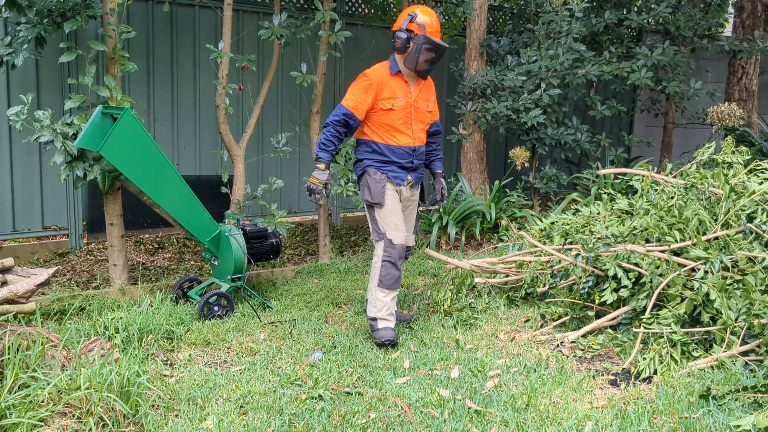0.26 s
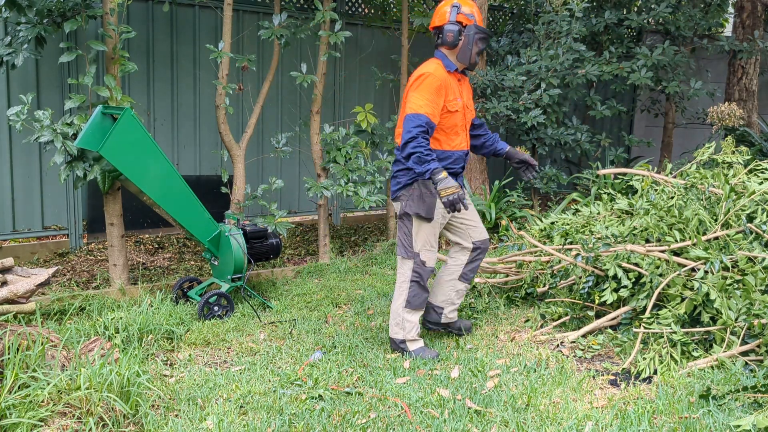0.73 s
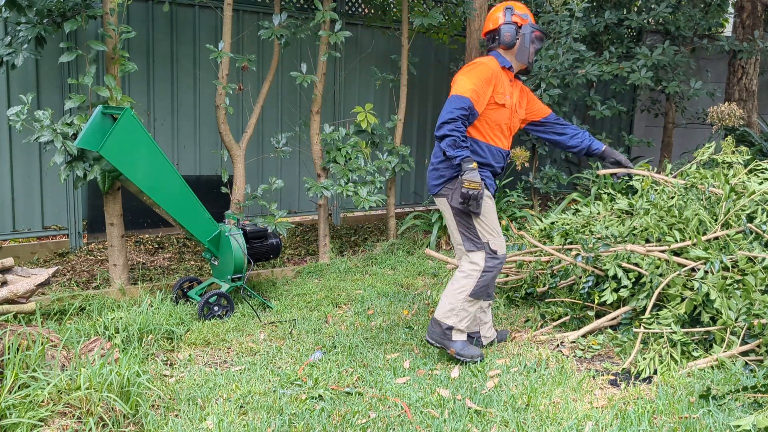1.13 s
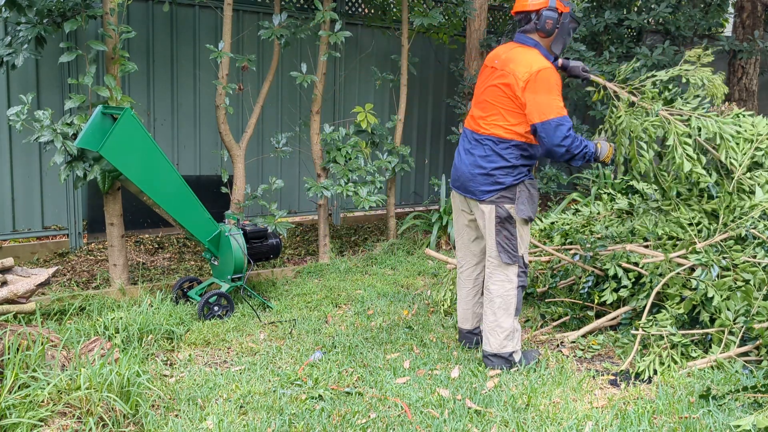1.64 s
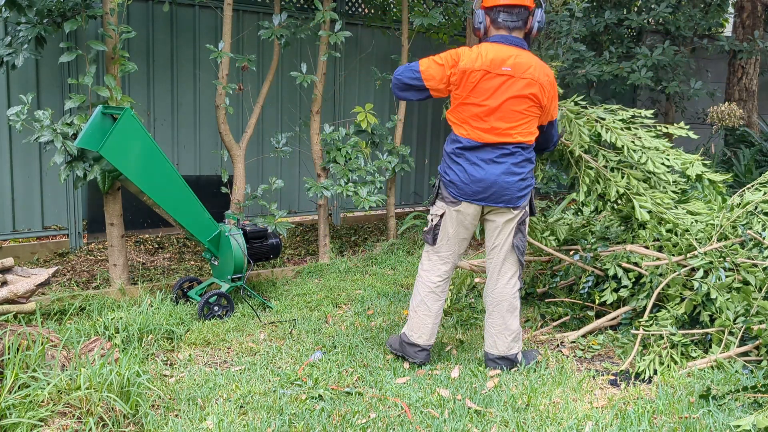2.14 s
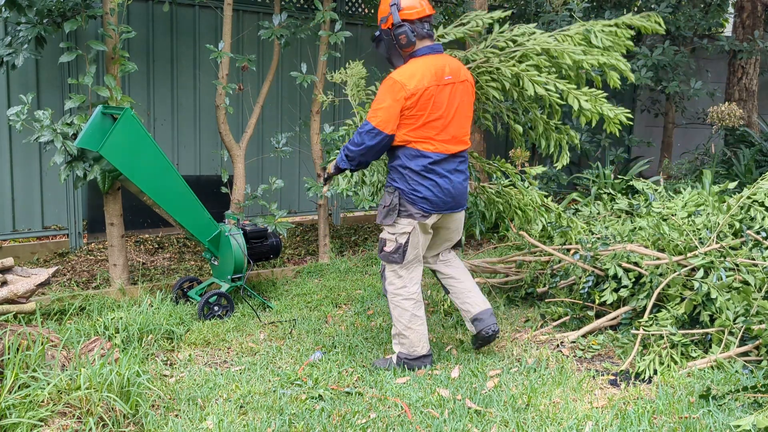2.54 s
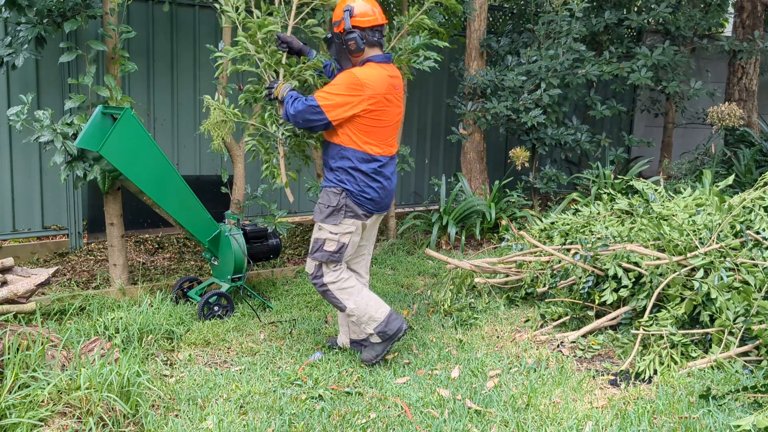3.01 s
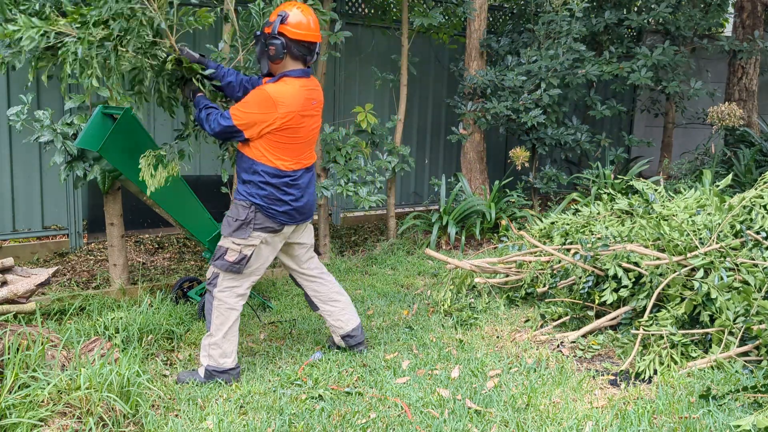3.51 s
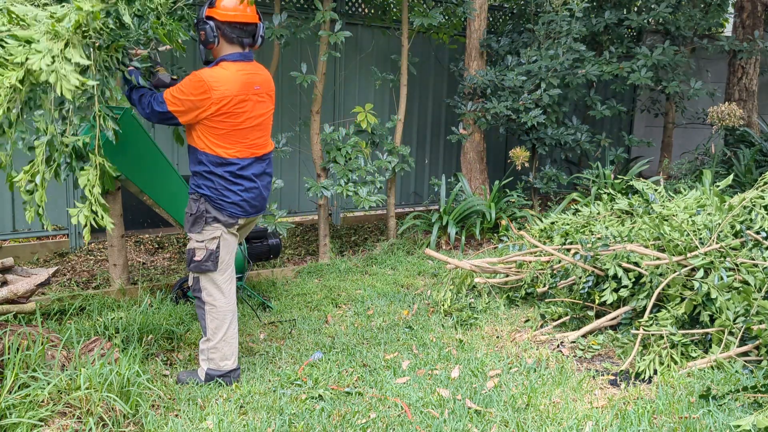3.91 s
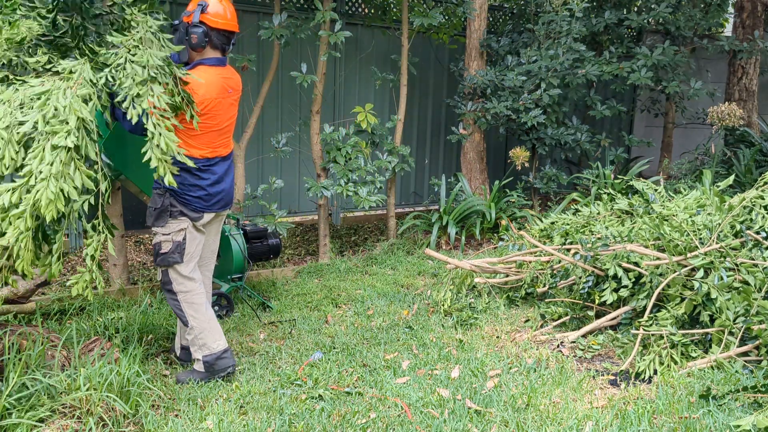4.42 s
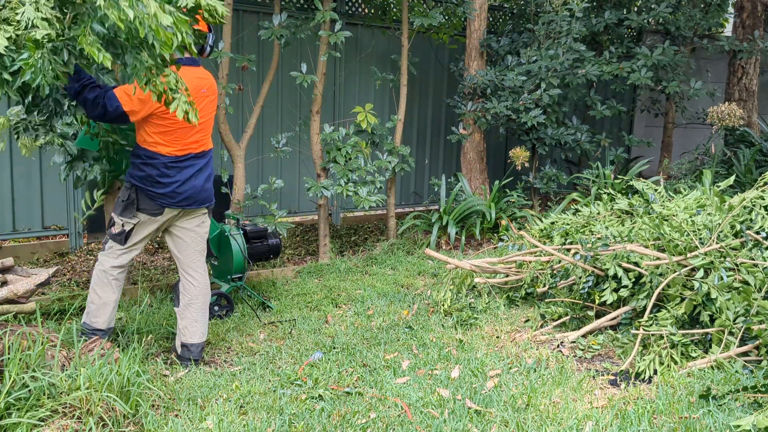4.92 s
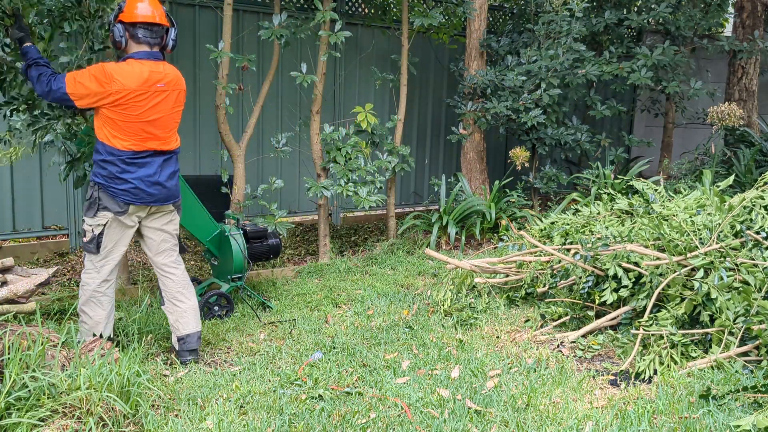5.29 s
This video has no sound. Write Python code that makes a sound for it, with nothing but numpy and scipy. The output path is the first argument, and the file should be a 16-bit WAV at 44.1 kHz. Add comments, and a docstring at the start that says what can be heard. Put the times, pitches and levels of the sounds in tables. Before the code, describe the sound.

A brief electrical sizzle starts the clip as a chipper motor climbs in pitch, its whine fading into a constant drone with light rattle and airy hiss. Leaves swish as a branch is dragged free and swung round, then come dry twig ticks and short gritty scrapes on sheet metal. Open garden, stereo microphone some metres back, machine slightly left.

```python
"""A small electric wood chipper runs up to speed and idles in a fenced backyard, a few metres to the left.
The motor whines while it pulls, with a brief sizzle of its starting winding; the cutter disc hums, rattles
and churns air through the chute: tones locked to the shaft, turn-periodic lines and puffing filtered noise.
A leafy branch is dragged off a pile, carried over and pushed at the hopper: dense ticks of leaves,
sharp bursts of snapping twigs and gritty noise strokes of stems on sheet metal."""
import sys
import numpy as np
from scipy import signal
from scipy.fft import rfft, irfft
from scipy.io import wavfile
from scipy.ndimage import uniform_filter1d

SR = 44100
rng = np.random.default_rng(int(sys.argv[2]) if len(sys.argv) > 2 else 0)


def generate_wav(signal):
    """Clip the signal to [-1, 1] and save it as 16-bit WAV at the path in sys.argv[1]."""
    frames = np.transpose(np.atleast_2d(signal))
    scaled = np.clip(frames, -1, 1) * 32767
    pcm = np.round(scaled).astype(np.int16)
    wavfile.write(sys.argv[1], SR, pcm)


N = 244755
TIME = np.arange(N) / SR
FREQ = np.fft.rfftfreq(N, 1 / SR) + 1e-3  # Hz, kept off zero
RUN_HZ = 49.67  # shaft running speed

# snapping twigs: [t/s, relative peak/dB, low band/dB]
TWIG_SNAPS = [(2.9477, -34, -12), (3.0131, -34, -15), (3.2994, -33, -12), (3.49, -33, -15),
              (3.878, -27, -16), (3.937, -36, 3), (3.944, -27, -7), (4.229, -34, -9), (4.7194, -34, 6)]


def undb(db):
    """Decibels to gain."""
    return 10 ** (np.asarray(db) / 20)


def unit(x):
    """Scale to rms 1."""
    return x / np.sqrt(np.mean(x ** 2))


def curve(rows):
    """Join (t/s, value) rows by straight lines."""
    return np.interp(TIME, *np.transpose(rows))


def at(points, hz):
    """Read (f/Hz, value) points on a log-frequency axis."""
    f, value = np.transpose(points)
    return np.interp(np.log(hz), np.log(f), value)


def shape(x, gain):
    """Filter by a frequency response."""
    return irfft(rfft(x) * gain, N)


def resonance(f, hz, width_hz):
    """Response of one mode, 1 at its centre."""
    return 1 / (1 + 1j * (f ** 2 - hz ** 2) / (f * width_hz))


def ringing(modes):
    """Summed squared responses of (f/Hz, width/Hz, level/dB) modes."""
    return sum(undb(db) * abs(resonance(FREQ, hz, width_hz)) ** 2 for hz, width_hz, db in modes)


def lift(modes, hz):
    """What (f/Hz, width/Hz, level/dB) resonances and nulls add to a tone of this pitch, in dB."""
    return sum(db * abs(resonance(hz, centre_hz, width_hz)) ** 2 for centre_hz, width_hz, db in modes)


def walk(rate_hz):
    """Smooth random wander of rms 1: random steps at this rate, averaged twice."""
    k = int(SR / max(rate_hz, .5))
    steps = rng.standard_normal(2000)[np.arange(N) // k % 2000]
    return unit(uniform_filter1d(uniform_filter1d(steps, k), k))


def swells(rows):
    """Gain of overlapping bell-shaped (t/s, length/s, level/dB) strokes, added in power."""
    power = sum(undb(db) ** 2 * np.exp(-((TIME - t_s) / length_s) ** 2) for t_s, length_s, db in rows)
    return np.sqrt(power)


def outdoors(three, gain):
    """Colour one direct and two scattered signals; the bass is shared, the treble comes off fence and trees."""
    # likeness of the channels: [f/Hz, power share of direct sound/0-1]
    direct_share = [(200, 0.99), (330, 0.68), (600, 0.44), (1100, 0.35), (3000, 0.24), (8000, 0.2)]
    direct = np.clip(at(direct_share, FREQ), 0, 1)
    z = rfft(three) * gain
    return unit(irfft(z[0] * np.sqrt(direct) + z[1:] * np.sqrt(1 - direct), N))


def shaft_hz():
    """Turns per second: exponential run-up that eases into the running speed."""
    start_hz, growth_per_s, settle_sharpness = 27.5, .705, 28
    free_hz = start_hz * np.exp(growth_per_s * TIME)
    return RUN_HZ / (1 + (RUN_HZ / free_hz) ** settle_sharpness) ** (1 / settle_sharpness)


def mains_pull():
    """The magnetic pull, twice in each cycle of the mains."""
    mains_hz = 50
    return np.sin(4 * np.pi * mains_hz * TIME)


def current(speed):
    """Relative motor current, near 1 at standstill: falls as the shaft catches up with the mains."""
    knee_slip, idle_current = 0.26, 0.034
    slip = 1 - speed
    return idle_current + slip ** 2 / (slip ** 2 + knee_slip ** 2)


def sizzle(throb=.2):
    """The starting winding sizzles with the mains, growing until it is switched out."""
    # ringing of the sizzle: [f/Hz, width/Hz, level/dB]
    sizzle_modes = [(4800, 6100, -1), (7300, 1400, 5), (9000, 800, 1), (10300, 490, -9), (12100, 3000, 3),
                    (14900, 1100, 2)]
    level_db, rise_db_per_s, switch_out_s, release_s = -49.5, 9, 0.346, .022
    noise = outdoors(rng.standard_normal((3, N)) * (1 + throb * mains_pull()), ringing(sizzle_modes))
    since_s = TIME - switch_out_s
    swell = undb(level_db + rise_db_per_s * np.minimum(since_s, 0))
    return noise * swell * np.exp(-np.maximum(since_s, 0) / release_s)


def motor(turns, speed):
    """Rotor slots sweep the stator and ring the casing, over a rough buzz; shaft wobble swings the pitch."""
    # motor casing: [f/Hz, width/Hz, level/dB]
    casing_modes = [(670, 150, -4), (775, 130, 0), (1100, 250, -16), (1430, 340, -11), (1800, 300, -14),
                    (2060, 170, -8), (2900, 600, -18)]
    slots, harmonic_slope_db = 24, -4  # slope per tenfold harmonic number
    wobble_rad, mains_depth_rad, rough_rad = 1.7, .5, .7
    whine_db, buzz_db = -21.3, -24.5  # at drive 1
    whine_speed_db = 60  # per tenfold speed at the same current
    buzz_top_hz = 1300  # the buzz rings mostly the lowest casing modes
    swing_rad = wobble_rad * np.sin(2 * np.pi * turns) + mains_depth_rad * mains_pull()
    throb = 1 + .15 * np.cos(2 * np.pi * turns)
    drive = current(speed) * throb * undb(whine_speed_db * np.log10(speed))
    paths = np.zeros((3, N))
    for path in paths:
        for k in range(1, 5):
            smear_rad = swing_rad + rough_rad * walk(140)
            phase = 2 * np.pi * k * slots * turns + k ** .6 * smear_rad
            path += undb(harmonic_slope_db * np.log10(k)) * np.sin(phase)
    # outdoors() levels to rms 1, so restore the rms of the drive
    whine = outdoors(paths * drive, ringing(casing_modes)) * np.sqrt(np.mean(drive ** 2))
    buzz_colour = ringing(casing_modes) / (1 + (FREQ / buzz_top_hz) ** 2)
    buzz = outdoors(rng.standard_normal((3, N)), buzz_colour)
    return whine * undb(whine_db) + buzz * drive * undb(buzz_db)


def disc(turns, speed, hum_db=-20, speed_db=48, waver_db=1.0, blade_waver_db=.5):
    """Blade tone, three beats a turn, and chute-coloured shaft harmonics; they stumble while the disc is slow."""
    # shaft harmonics at full speed: [multiple of shaft rate, relative level/dB]
    harmonics = [(1, -23.5), (2, -10.5), (4, -29.5), (5, -14.5), (6, -16), (7, -26), (8, -23), (9, -32),
                 (10, -26), (12, -27)]
    # resonances and nulls of the chute: [f/Hz, width/Hz, level/dB]
    chute_modes = [(61.7, 27, -8), (118.4, 17, 34.5), (216, 46, 10), (275, 15, -21)]
    # standing waves that swell and cancel the sweeping blade tone: [f/Hz, width/Hz, level/dB]
    standing_waves = [(107, 13, 4), (127.6, 3.5, -32), (130.2, 17.9, 11), (135.4, 1.5, -11.5),
                      (144.74, 3.92, -16.5)]
    blade_db, blade_speed_db = -18.5, 106  # at full speed before standing waves; per tenfold speed
    stumble_db = 25 * (1 - speed) ** 2
    tone_db = blade_db + blade_speed_db * np.log10(speed) + lift(standing_waves, 3 * RUN_HZ * speed)
    tone_db = tone_db + (blade_waver_db + stumble_db) * walk(9.9)
    out = undb(tone_db) * np.sin(2 * np.pi * 3 * turns)
    for k, db in harmonics:
        chute_db = lift(chute_modes, k * RUN_HZ * speed) - lift(chute_modes, k * RUN_HZ)
        level_db = hum_db + db + chute_db + speed_db * np.log10(speed)
        level_db = level_db + (waver_db + stumble_db) * walk(12)
        out = out + undb(level_db) * np.sin(2 * np.pi * (round(k) * turns + rng.random()))
    return np.sqrt(2) * out  # sine peak from rms


def rattle(turns, speed, db=-18, speed_db=45, size=4096):
    """Bearing and housing rattle repeats with the shaft, drifting between two patterns at even loudness."""
    # rattle spectrum: [f/Hz, relative level per harmonic/dB]
    rattle_colour = [(640, -48), (1000, -39), (1600, -45), (2000, -44.5), (2400, -51.5), (3400, -56),
                     (4600, -56), (5200, -58.5)]
    orders = np.arange(13, 105)
    drift_rad = .45 * walk(3)
    level = undb(at(rattle_colour, orders * RUN_HZ))
    turn_grid = np.arange(size) / size
    out = 0
    for weight in (np.cos(drift_rad), np.sin(drift_rad)):
        lines = np.zeros((2, size // 2 + 1), complex)
        lines[:, orders] = level * np.exp(2j * np.pi * rng.random((2, len(orders))))
        one_turn = irfft(lines) * size / np.sqrt(2)
        pattern = np.array([np.interp(turns, turn_grid, side, period=1) for side in one_turn])
        out = out + weight * pattern
    return out * undb(db + speed_db * np.log10(speed))


def churn(turns, speed, air_db=-30.5, hiss_db=-42, air_speed_db=55, hiss_speed_db=22, puff=0.25, flutter=0.038):
    """Turbulence in the housing, puffing as the unequal cutters pass the outlet."""
    # air churned by the disc: [f/Hz, relative level/dB per Hz]
    air_colour = [(35, -17), (46, -4.5), (80, -7.5), (125, 2.5), (175, -5.5), (220, -2.5), (270, -12.5),
                  (410, -9.5), (520, -12), (580, -9.5), (660, -18), (830, -17)]
    # hiss at blade tips and outlet: [f/Hz, relative level/dB per Hz]
    hiss_colour = [(500, -67), (900, -3), (1800, -4), (2100, -8), (2300, -10.5), (3200, -13), (4350, -17),
                   (4560, -14.5), (4750, -22.5), (5700, -26.5), (6700, -25.5), (8000, -24), (12300, -28.5),
                   (16000, -48)]
    beat = sum(np.cos(2 * np.pi * k * turns) for k in (1, 2, 4))
    roll_off = 1 / np.sqrt(1 + (FREQ / 900) ** 10)
    air = outdoors(rng.standard_normal((3, N)) * (1 + puff * beat), undb(at(air_colour, FREQ)) * roll_off)
    roll_on = FREQ ** 2 / (FREQ ** 2 + 300 ** 2)
    hiss = outdoors(rng.standard_normal((3, N)) * (1 + flutter * beat), undb(at(hiss_colour, FREQ)) * roll_on)
    air_eddies_db = .7 * walk(12)
    hiss_eddies_db = .4 * walk(16) + .35 * walk(5)
    air = air * undb(air_db + air_speed_db * np.log10(speed) + air_eddies_db)
    return air + hiss * undb(hiss_db + hiss_speed_db * np.log10(speed) + hiss_eddies_db)


def shaded(x):
    """The worker steps in front; the body takes some midrange out of the machine's sound."""
    # worker in front of the machine: [t/s, share shaded/0-1]
    in_front = [(3.7, 0.15), (4.5, 0.85)]
    # full shading: [f/Hz, width/Hz, level/dB]
    shade_modes = [(536, 145, -5), (1600, 510, -2.5)]
    return x + curve(in_front) * (shape(x, undb(lift(shade_modes, FREQ))) - x)


def stirring():
    """How hard the leaves move: carrying, shakes and the jolt of each snap, added in power."""
    # soft rustle from pile to hopper: [t/s, relative level/dB]
    carry_levels = [(.45, -61.5), (.9, -57), (2.7, -56), (3.6, -53), (5.55, -54)]
    # shakes: grasped, pulled free, swung round, pushed in: [t/s, length/s, relative level/dB]
    shake_strokes = [(.87, .035, -57), (1.66, 0.27, -47.5), (2.28, 0.19, -49.5), (3.09, 0.088, -56),
                     (3.305, 0.035, -51.5), (3.46, .04, -55), (4.06, 0.049, -53.5), (4.24, .03, -52),
                     (4.4, 0.044, -51), (4.71, 0.1, -50), (5.22, 0.044, -54), (5.38, 0.29, -53.5)]
    jolt_db, jolt_s = -24, 0.018  # against the snap's table peak; power decay time
    jolts = 0
    for t_s, peak_db, _ in TWIG_SNAPS:
        decay = (TIME > t_s) * np.exp(-abs(TIME - t_s) / jolt_s)
        jolts = jolts + undb(peak_db + jolt_db) ** 2 * decay
    return np.sqrt(undb(curve(carry_levels)) ** 2 + swells(shake_strokes) ** 2 + jolts)


def leaves(db=5.5, grains_per_s=1100, spread_db=1.5, tail_s=0.0024):
    """Leaves flick each other: dense tiny decaying ticks, each in its own range of pitch."""
    # leaf spectrum: [f/Hz, relative level/dB per Hz]
    leaf_colour = [(1200, -1), (3000, 1), (4200, 1.5), (5700, -1.5), (6800, 0.5), (8000, -1), (10500, 3.5),
                   (12600, 5), (14000, 1), (16000, -2)]
    spectrum = 0
    for hz in np.geomspace(2500, 14000, 6):
        struck = rng.random((2, N)) < grains_per_s / SR
        ticks = struck * undb(spread_db * np.minimum(rng.exponential(size=(2, N)), 6)) ** 2
        power = signal.lfilter([1], [1, -np.exp(-1 / (tail_s * SR))], ticks)
        band = np.exp(-(np.log2(FREQ / hz) / 0.39) ** 2)  # width in octaves
        spectrum = spectrum + rfft(np.sqrt(power) * rng.standard_normal((2, N))) * band
    rustle = unit(irfft(spectrum * undb(at(leaf_colour, FREQ)), N))
    return rustle * undb(db) * stirring()


def twigs(db=3, body_db=2, ring_s=0.0068, size=4096):
    """Each snap is a sharp tick with a duller knock of the wood under it, falling 60 dB in ring_s."""
    out = np.zeros((2, N))
    t_s, f_hz = np.arange(size) / SR, np.fft.rfftfreq(size, 1 / SR) + 1
    for snap_s, peak_db, low_db in TWIG_SNAPS:
        burst = rng.standard_normal((2, size)) * np.exp(-np.log(1000) * t_s / ring_s)
        tick = resonance(f_hz, 12000, 5000) ** 2
        knock = undb(body_db + low_db) * resonance(f_hz, 3500, 3500) ** 2
        snap = irfft(rfft(burst) * (tick + knock))
        start = int(snap_s * SR)
        out[:, start:start + size] += snap / abs(snap).max() * undb(peak_db + db)
    return out


def scrapes(hz=4300, width_hz=1900):
    """Stems rub over the hopper's sheet-metal lip in short gritty strokes."""
    # branch on the hopper: [t/s, length/s, level/dB]
    scrape_strokes = [(3.945, .012, -44), (4.64, .02, -49), (4.69, .01, -47), (4.719, .008, -37.5),
                      (4.75, .022, -43.5)]
    catches = undb(4.5 * walk(600) + 1.5 * walk(120))
    grit = rng.standard_normal((2, N)) * catches
    return swells(scrape_strokes) * unit(shape(grit, resonance(FREQ, hz, width_hz)))


def scene():
    """The machine and the branch, both to the left."""
    # left minus right: [f/Hz, level/dB]
    left_excess = [(60, 1.9), (150, 1.4), (300, 2.4), (600, 4), (1100, 5), (2000, 4.2), (4000, 1.8),
                   (12000, 2.7)]
    lag_s = 0.00018
    hz = shaft_hz()
    turns = np.cumsum(hz) / SR + 0.0048 * walk(3.9)
    speed = hz / RUN_HZ
    machine = sizzle() + motor(turns, speed) + disc(turns, speed) + rattle(turns, speed) + churn(turns, speed)
    left, right = shaded(machine) + leaves() + twigs() + scrapes()
    tilt = undb(at(left_excess, FREQ) / 2)
    # the right port hears it a little later and weaker
    delay = np.exp(-2j * np.pi * FREQ * lag_s)
    return np.array([shape(left, tilt), shape(right, delay / tilt)])


def record(dry, low_hz=36, top_hz=15650):
    """The microphone drops the deepest bass, its ports cut a notch in the treble, and the top is cut off."""
    low_cut = 1 / np.sqrt(1 + (low_hz / FREQ) ** 12)
    notch = 1 - .58 * resonance(FREQ, 14050, 1500)
    top_cut = signal.ellip(10, .2, 80, top_hz, fs=SR, output="sos")
    return signal.sosfilt(top_cut, shape(dry, low_cut * notch))


dry = scene()
out = record(dry)
generate_wav(out)
```